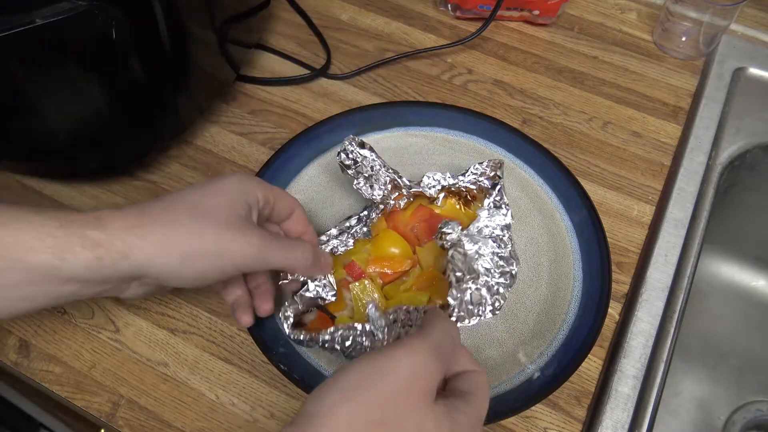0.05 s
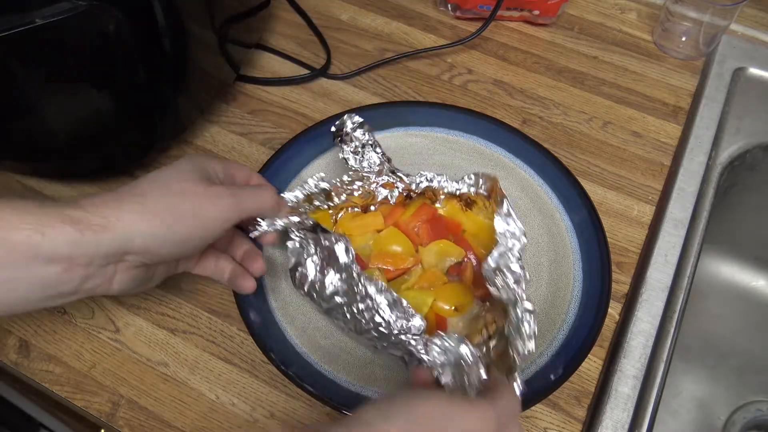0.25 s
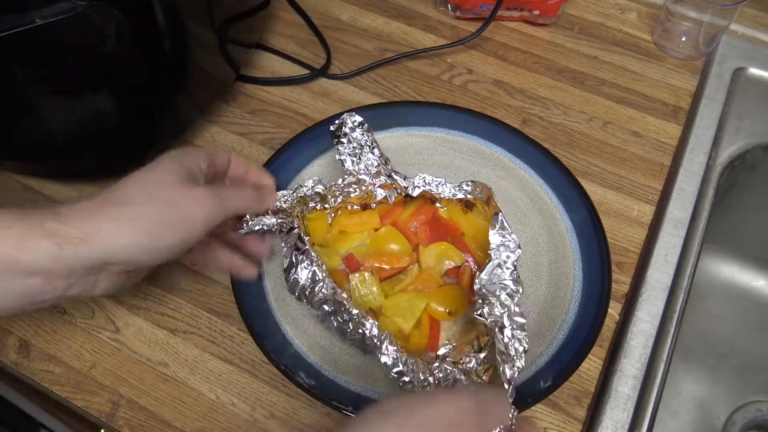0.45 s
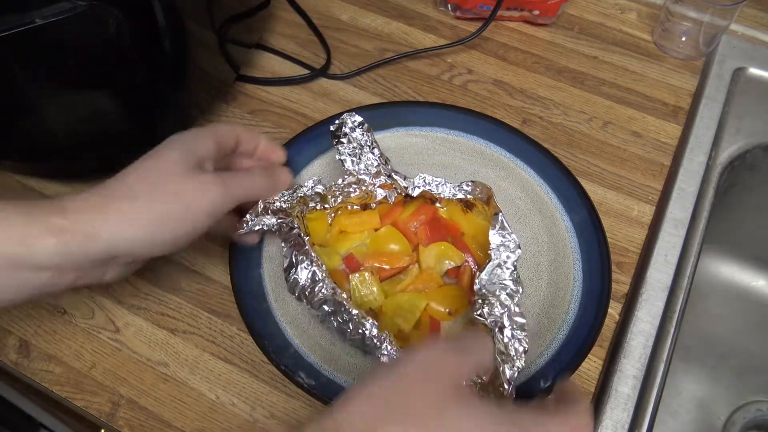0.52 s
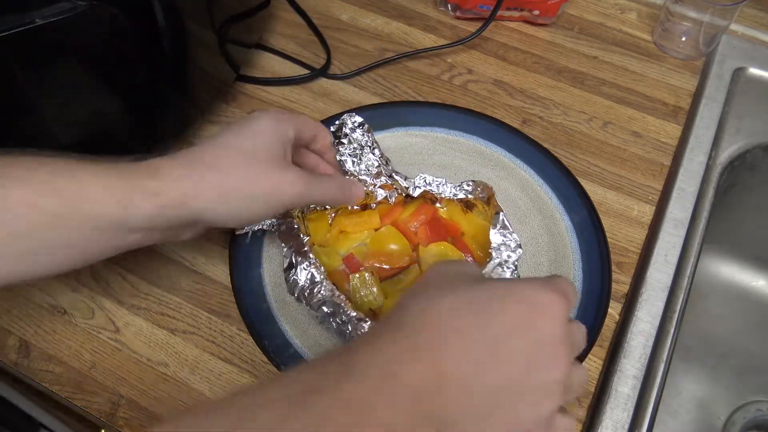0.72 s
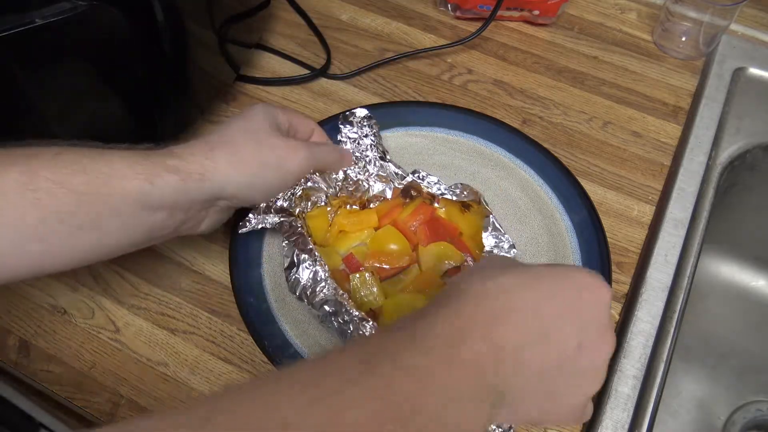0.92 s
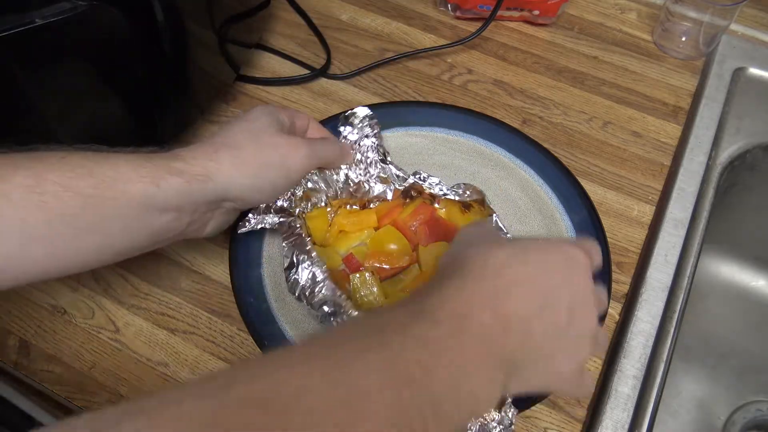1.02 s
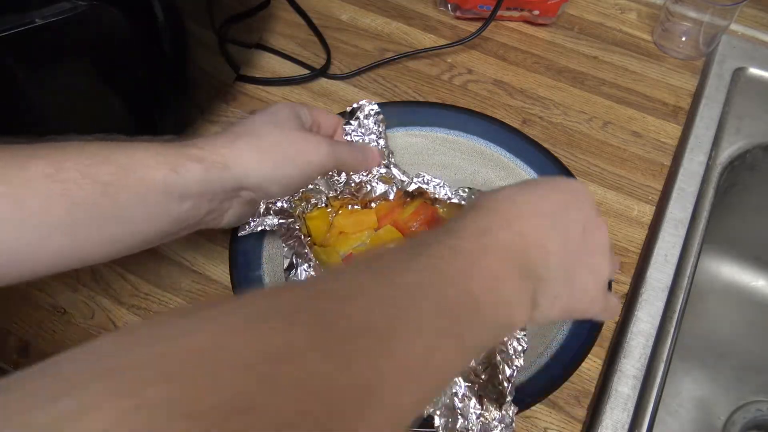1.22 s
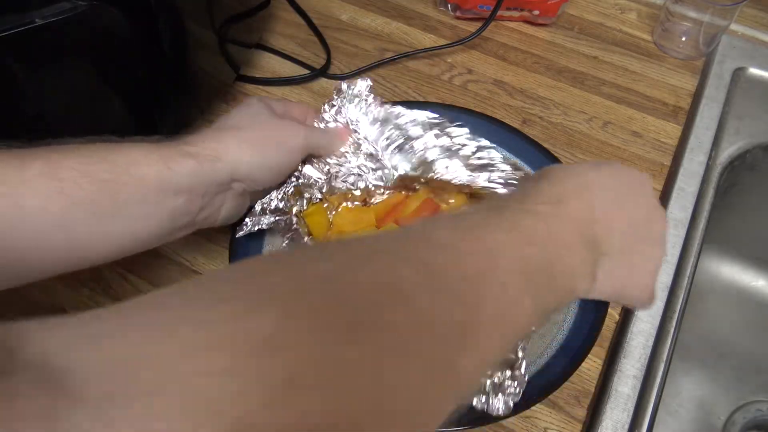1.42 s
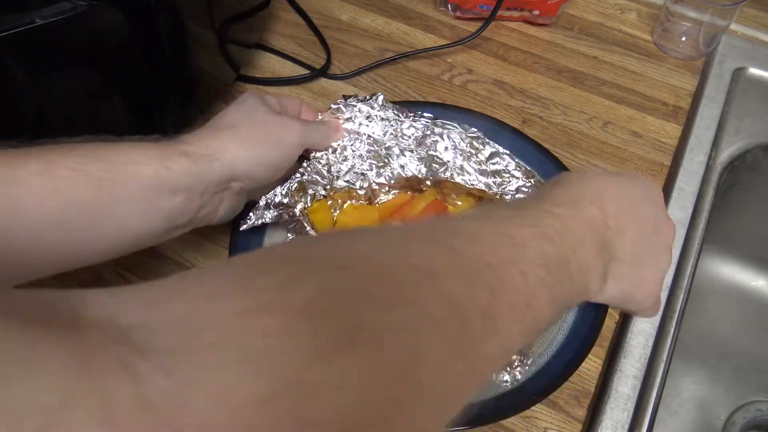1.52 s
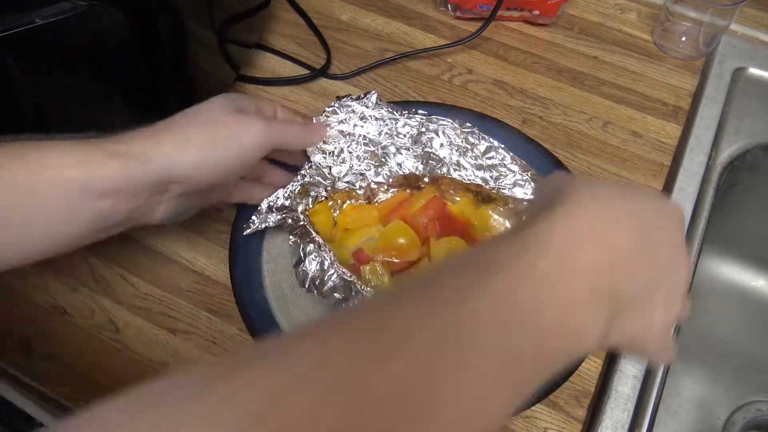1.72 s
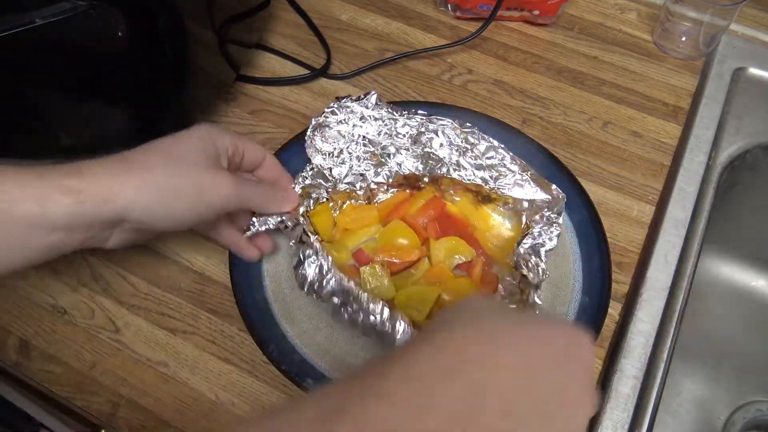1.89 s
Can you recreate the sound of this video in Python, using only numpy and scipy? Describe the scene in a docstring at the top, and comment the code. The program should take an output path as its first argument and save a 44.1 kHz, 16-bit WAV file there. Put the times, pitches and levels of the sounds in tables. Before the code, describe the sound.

Crinkling foil, close and dry: short irregular tugs of bright crackle and tinny creasing snaps, densest in the middle and later part, thinning at the end, with soft thuds, short room reflections and quiet low hum.

```python
"""Opening a foil packet

Hands pull open an aluminium foil packet on a plate, close to the microphone in a small kitchen.
Each pull sets off a swarm of tiny clicks that ring facets of the foil, and shakes the whole sheet.
Single creases snap as short cracks; hollow pops and dull low knocks are each a thud plus a note.
Counter and walls add a short noise tail over a low rumble of filtered noise and a faint hum of sines."""
import sys
import numpy as np
from scipy import signal
from scipy.fft import rfft, irfft, next_fast_len
from scipy.io import wavfile
from scipy.ndimage import uniform_filter1d

SR = 44100
rng = np.random.default_rng(int(sys.argv[2]) if len(sys.argv) > 2 else 0)


def generate_wav(sig):
    """Save sig (samples, or channels by samples) to the path in sys.argv[1] as 16-bit PCM at SR."""
    pcm = np.round(np.clip(np.atleast_2d(sig).T, -1, 1) * 32767).astype(np.int16)
    wavfile.write(sys.argv[1], SR, pcm)


N = 85995  # length of the scene [samples]

# A snap, pop or knock has the energy of its level held for this long.
SNAP_SPAN_S, BODY_SPAN_S = 0.0016, 0.0036
# In every name, T60 is the time a decay is set to take to fall by 60 dB.


def undb(db):
    """Turn decibels into a factor for the amplitude."""
    return 10 ** (np.asarray(db) / 20)


def unit(x):
    """Scale to an energy of one."""
    return x / np.sqrt(np.sum(x ** 2) + 1e-18)


def fade(t, t60):
    """Exponential decay that falls by 60 dB in t60 seconds."""
    return np.exp(-np.log(1000) * t / t60)


def colour(x, points):
    """Filter x through (frequency [Hz], gain [dB]) points, with no sound ahead of its cause."""
    size = next_fast_len(2 * len(x)) * 2
    hz, db = np.array(points).T
    f = np.maximum(np.fft.rfftfreq(size, 1 / SR), 1)
    gain = undb(np.interp(np.log(f), np.log(hz), db))
    # Folding the cepstrum onto positive times makes the filter minimum phase.
    cepstrum = irfft(np.log(gain))
    cepstrum[1:size // 2] *= 2
    cepstrum[size // 2 + 1:] = 0
    return irfft(rfft(x, size) * np.exp(rfft(cepstrum)))[:len(x)]


def scaled(points, factor):
    """Shift (frequency, level) points up or down in pitch."""
    return [(hz * factor, db) for hz, db in points]


def burst(t60, size=4096, count=3):
    """A decaying puff of noise with a nearly even spectrum; t60 sets its decay only roughly."""
    envelope = fade(np.arange(size) / SR, t60)
    x = rng.standard_normal(size) * envelope
    for _ in range(count):
        spectrum = rfft(x)
        flat = irfft(spectrum / (np.abs(spectrum) + 1e-9))
        x = flat * np.sqrt(envelope)  # flattening smears the noise in time, so fade it again
    return unit(x)


def mode(hz, t60, size=8192):
    """A decaying sine that starts from rest, like one resonance of a struck sheet."""
    t = np.arange(size) / SR
    return np.sin(2 * np.pi * hz * t) * fade(t, t60)


def ring(x, response):
    """Play x through an impulse response."""
    return signal.fftconvolve(x, response)[:N]


def add(out, start_s, x):
    """Mix x in at a time."""
    i = max(int(start_s * SR), 0)
    out[i:i + len(x)] += x[:max(N - i, 0)]


def room_tone():
    """Low rumble from filtered noise, and the hum of an appliance from steady sines."""
    # Rumble spectrum: (frequency [Hz], relative level [dB per Hz])
    rumble_shape = [(15, 0.5), (30, 5.5), (45, 0.5), (60, -4.5), (78, -17.5), (120, -8), (210, -9.5),
                    (300, -9), (450, -10.5), (680, -18.5), (1200, -25), (2500, -35), (8000, -41.5),
                    (16000, -46)]
    # Hum tones: (frequency [Hz], RMS level [dB])
    hum_tones = [(58.5, -54), (207, -65), (414, -62)]
    rumble_db = -50.5  # RMS level
    t = np.arange(N) / SR
    hum = np.zeros(N)
    for hz, db in hum_tones:
        hum += undb(db) * np.sqrt(2) * np.sin(2 * np.pi * (hz * t + rng.random()))
    rumble = unit(colour(rng.standard_normal(N), rumble_shape))
    return hum + undb(rumble_db) * np.sqrt(N) * rumble


def swarm(rate, size=500):
    """Random clicks of uneven strength; the hand feeds in energy evenly."""
    spread_db = 4.5
    happens = rng.random(N) < rate / SR  # rate is in clicks per second
    strength = undb(spread_db * rng.standard_normal(N))
    clicks = happens * strength * rng.choice([-1, 1], N)
    power = np.abs(uniform_filter1d(clicks ** 2, size))
    return clicks / np.sqrt(power + 1e-9)


def effort(start, length):
    """Attack, hold and release of one pull."""
    attack_s, release_s = 0.005, 0.012  # straight rise; time constant of the exponential release
    t = np.arange(N) / SR - start
    return np.clip(t / attack_s, 0, 1) * np.exp(-np.maximum(t - length, 0) / release_s)


def facet(hz, size=4096):
    """One facet buckles: a dry crack and a few modes that die within milliseconds."""
    # Modes of a facet: (ratio to its pitch [1], relative level [dB])
    facet_modes = [(0.998, 5), (1.121, -10), (1.5, -7)]
    # Spectrum of its crack: (ratio to its pitch [1], relative level [dB per Hz])
    crack_shape = [(.08, -18.5), (.4, -14.5), (.6, -10.5), (1, 0), (1.5, -2.5), (2.2, -11.5), (4, -36.5)]
    modes_t60_s, crack_t60_s, rise_s = .0048, .011, .0011
    crack_db = -1  # relative to the modes
    t = np.arange(size) / SR
    modes = np.zeros(size)
    for ratio, db in facet_modes:
        pitch = min(hz * ratio, SR / 2)
        modes += undb(db) * np.sin(2 * np.pi * (pitch * t + rng.random()))
    crack = unit(colour(burst(crack_t60_s), scaled(crack_shape, hz)))
    both = unit(modes * fade(t, modes_t60_s)) + undb(crack_db) * crack
    return unit(both * np.minimum(t / rise_s, 1))


def crumpling(count=24, flex_samples=12000):
    """Swarms of tiny buckles ring many facets; slower flexes shake the panel of foil being pulled."""
    # Pulls and folds of the sheet: (start [s], length [s], crackle before its colouring [dB],
    # body [dB], low flap [dB], pitch of the flexing panel [Hz])
    pulls = [(0.04, 0.044, -56, -60.5, -54.5, 695), (0.065, 0.029, -50, -54.5, -52.5, 820),
             (0.116, 0.044, -51, -59, -57, 830), (0.171, 0.042, -59.5, -66, -61, 900),
             (0.226, 0.011, -40, -38.5, -67, 1210), (0.244, 0.037, -51.5, -58, -57, 1140),
             (0.292, 0.062, -42, -48.5, -73, 934), (0.368, 0.096, -48.5, -51, -57, 1207),
             (0.454, 0.007, -40, -43, -64, 1260), (0.468, 0.01, -35.5, -43, -49, 1270),
             (0.484, 0.024, -53, -48, -52, 1280), (0.672, 0.103, -50.5, -56.5, -56, 1880),
             (0.791, 0.047, -48, -46.5, -48, 746), (0.843, 0.076, -46, -44, -48, 740),
             (0.91, 0.069, -50.5, -52.5, -66, 1920), (0.972, 0.018, -46, -47.5, -67, 2020),
             (0.987, 0.13, -48.5, -55, -60, 2070), (1.045, 0.023, -36.5, -46, -60, 2020),
             (1.072, 0.018, -35, -38, -56, 670), (1.184, 0.043, -43.5, -45.5, -61, 1510),
             (1.234, 0.024, -41.5, -44, -53, 830), (1.248, 0.057, -52, -60, -65, 820),
             (1.315, 0.032, -47, -58.5, -54, 1440), (1.372, 0.061, -49, -49.5, -49.5, 1400),
             (1.431, 0.045, -41, -44, -48.5, 770), (1.483, 0.033, -37, -38.5, -54, 1390),
             (1.524, 0.015, -41.5, -43, -75, 2040), (1.531, 0.089, -57, -59, -60, 840),
             (1.632, 0.052, -46, -51, -48, 775), (1.662, 0.016, -32.5, -46.5, -46.5, 980),
             (1.871, 0.0073, -47, -49.5, -57, 1900), (1.924, 0.014, -44.5, -54, -47.5, 594)]
    # Colouring of the crackle: (frequency [Hz], gain [dB])
    crackle_colour = [(500, -17.5), (1800, -6.5), (2700, -6.5), (3500, -4), (5000, -3), (8500, 2),
                      (12000, -1.5), (16000, -5.5)]
    # Spectrum of the shaken panel: (frequency [Hz], relative level [dB per Hz])
    rustle_shape = [(150, -16), (400, -2.5), (650, -3.5), (850, -3), (1050, -6), (1300, -6), (1650, -4.5),
                    (2100, -1.5), (2700, -20.5), (6000, -21)]
    # Spectrum of the low flap: (frequency [Hz], relative level [dB per Hz])
    flap_shape = [(40, -18), (110, -14), (190, 4.5), (290, .5), (450, -3), (700, -7), (1200, -31.5)]
    buckles_per_s, flexes_per_s = 5500, 1600
    facet_low_hz, facet_high_hz = 2652, 13300
    rustle_t60_s, flap_t60_s = 0.012, 0.019
    panel_db, panel_t60_s = -5, 0.027  # the panel's note, relative to its rustle
    spread_oct = .1
    clicks, flexes = swarm(buckles_per_s), swarm(flexes_per_s)
    which = rng.integers(0, count, N)  # the facet that each click rings
    out, crackle_power, flap_power = np.zeros((3, N))
    for start, length, crackle_db, body_db, flap_db, hz in pulls:
        pull = effort(start, length)
        crackle_power += (undb(crackle_db) * pull) ** 2
        flap_power += (undb(flap_db) * pull) ** 2
        # Each fold shifts the sheet's broad resonances.
        stiffness = 2 ** rng.uniform(-spread_oct, spread_oct)
        rustle = unit(colour(burst(rustle_t60_s), scaled(rustle_shape, stiffness)))
        note = unit(mode(hz, panel_t60_s, size=4096))
        panel = unit(rustle + undb(panel_db) * note)
        shaking = (flexes * pull)[int(start * SR):][:flex_samples]
        add(out, start, undb(body_db) * ring(shaking, panel))
    for k, hz in enumerate(np.geomspace(facet_low_hz, facet_high_hz, count)):
        facet_clicks = clicks * (which == k) * np.sqrt(crackle_power)
        out += ring(facet_clicks, colour(facet(hz), crackle_colour))
    flap = unit(colour(burst(flap_t60_s), flap_shape))
    return out + ring(flexes * np.sqrt(flap_power), flap)


def kitchen(x, size=20000):
    """Quick reflections from plate and counter, then a short tail whose extreme treble dies first."""
    # Decay of the tail: (frequency [Hz], t60 [s])
    room_decay = [(300, 0.3), (1100, 0.27), (3000, 0.29), (7000, 0.22), (14000, 0.13)]
    room_db, room_delay_s = -13, .005
    counter_db, counter_delay_s, counter_t60_s = -8.5, 0.0022, 0.027
    t = np.arange(size) / SR
    f = np.maximum(np.fft.rfftfreq(size, 1 / SR), 1)
    hz, t60s = np.array(room_decay).T
    noise = rfft(rng.standard_normal(size))
    tail = np.zeros(size)
    # Overlapping bands of the same noise each fade at their own pace.
    for share, t60 in zip(np.eye(len(hz)), t60s):
        band = irfft(noise * np.interp(np.log(f), np.log(hz), share))
        tail += band * fade(t, t60)
    response = np.zeros(N)
    add(response, room_delay_s, undb(room_db) * unit(tail))
    add(response, counter_delay_s, undb(counter_db) * burst(counter_t60_s))
    return x + ring(x, response)


def snaps():
    """Single creases flip over and jolt the packet around them."""
    # Creases that snap: (time [s], level of the ring [dB], pitch of the facet [Hz],
    # level of the sheet's body [dB])
    creases = [(0.0457, -47, 3860, -55), (.221, -11.5, 7065, -27.5), (0.2213, -23.5, 11000, -44),
               (0.223, -24, 4040, -32), (0.3012, -30, 10100, -68), (0.312, -31.5, 11200, -68),
               (.3304, -28, 10560, -42), (.3412, -31, 7100, -57), (.348, -40, 4520, -37),
               (0.4169, -33, 5260, -43.5), (.4708, -31, 5200, -32.5), (.4762, -31.5, 6700, -39),
               (0.7099, -35, 8400, -69), (.895, -47, 8850, -40), (.91, -34.5, 8260, -62),
               (1.017, -30.5, 6770, -49), (1.0175, -33, 12500, -64), (1.0515, -30, 8000, -56),
               (1.0837, -26, 9500, -35), (1.19, -40, 7700, -46), (1.2101, -28, 7840, -40),
               (1.2442, -33.5, 6500, -42), (1.3618, -26.5, 8700, -42.5), (1.3792, -35, 5740, -42),
               (1.396, -38, 8350, -59), (1.4075, -37, 7800, -39), (1.422, -24, 5300, -61),
               (1.4381, -32.5, 7140, -34.5), (1.454, -35, 5730, -54), (1.487, -31.5, 6950, -36.5),
               (1.5012, -29.5, 7860, -36), (1.5062, -40, 6060, -38), (1.5115, -25.5, 4920, -37.5),
               (1.6134, -39.5, 3300, -57), (1.6145, -38.5, 6850, -59), (1.661, -37, 3220, -34.5),
               (1.6677, -25, 7950, -31.5), (1.6709, -33, 3300, -51), (1.681, -33, 3150, -37),
               (1.813, -53, 5340, -61), (1.8496, -56, 5660, -67), (1.8758, -39, 5120, -56),
               (1.9285, -52, 8000, -47.5)]
    # Modes of the open packet, rung by every snap: (frequency [Hz], relative level [dB], t60 [s])
    packet_modes = [(864, -5, 0.063), (1109, -4.5, 0.078), (1450, 1.5, 0.018), (1950, -27.5, 0.07)]
    # Spectrum of the jolted sheet: (frequency [Hz], relative level [dB per Hz])
    body_shape = [(100, -23), (300, -16), (650, -3), (850, 0.5), (1050, -12.5), (1400, -6), (2100, -10.5),
                  (2900, -23.5), (6000, -27.5)]
    body_t60_s = 0.027
    packet_db = -8.5  # relative to the noise of the jolted sheet
    out = np.zeros(N)
    packet = unit(sum(undb(db) * mode(hz, t60) for hz, db, t60 in packet_modes))
    for start, ring_db, hz, body_db in creases:
        jolt = unit(colour(burst(body_t60_s, size=8192), body_shape))
        body = unit(jolt + undb(packet_db) * packet)
        add(out, start, facet(hz) * undb(ring_db) * np.sqrt(SNAP_SPAN_S * SR))
        add(out, start, body * undb(body_db) * np.sqrt(BODY_SPAN_S * SR))
    return out


def knocks():
    """Hollow pops of foil panels and dull low knocks on the plate: a short thud and a heavily damped note."""
    # Pops and knocks: (time [s], level [dB], pitch [Hz])
    hits = [(0.2218, -28, 879), (.3305, -35.5, 876), (.471, -34, 884), (0.4752, -33.5, 1112),
            (0.809, -38, 710), (.8945, -32, 690), (0.8968, -40, 247), (.901, -38, 653), (.91, -38, 2000),
            (1.084, -39, 693), (1.088, -38.5, 213), (1.419, -35, 1970), (1.43, -38, 114), (1.437, -33, 720),
            (1.511, -33, 1773), (1.668, -38, 660)]
    # Spectrum of the dull thud: (ratio to the pitch [1], relative level [dB per Hz])
    thud_shape = [(.12, -34), (.33, -3.5), (.7, -12), (1, 0), (1.4, -10), (5, -28)]
    thud_t60_s, note_t60_s = .016, .026
    out = np.zeros(N)
    for start, db, hz in hits:
        thud = colour(burst(thud_t60_s, size=8192), scaled(thud_shape, hz))
        hit = unit(unit(thud) + unit(mode(hz, note_t60_s)))
        add(out, start, hit * undb(db) * np.sqrt(BODY_SPAN_S * SR))
    return out


def scene():
    """The foil sounds in the kitchen, over the room's own noise."""
    foil = snaps() + crumpling() + knocks()
    return (kitchen(foil) + room_tone())[None]  # one channel


def record(dry):
    """The recorder cuts the top of the treble with a steep low-pass filter."""
    top_hz = 15900
    low_pass = signal.ellip(10, .2, 80, top_hz, fs=SR, output="sos")  # ripple and stopband in dB
    return signal.sosfilt(low_pass, dry)


dry = scene()
out = record(dry)
generate_wav(out)
```